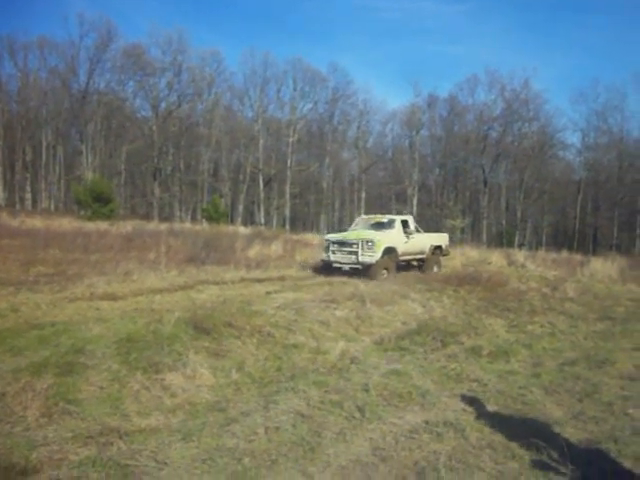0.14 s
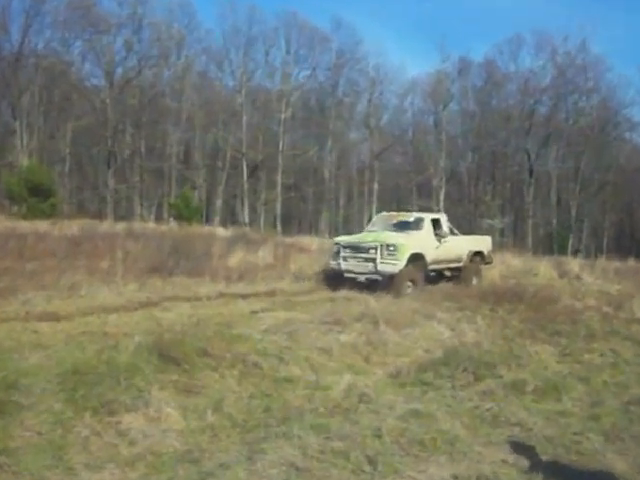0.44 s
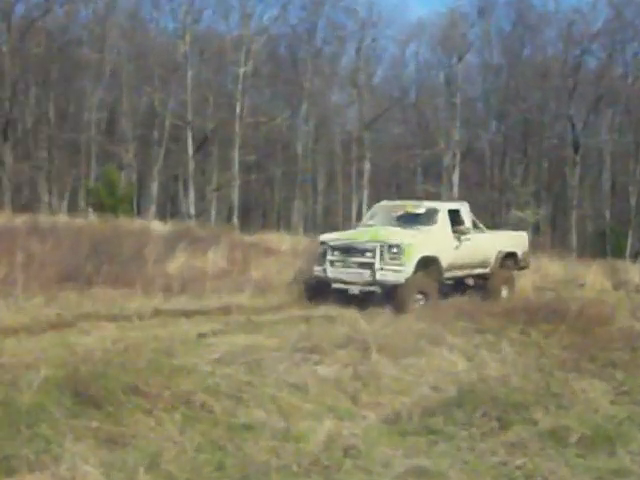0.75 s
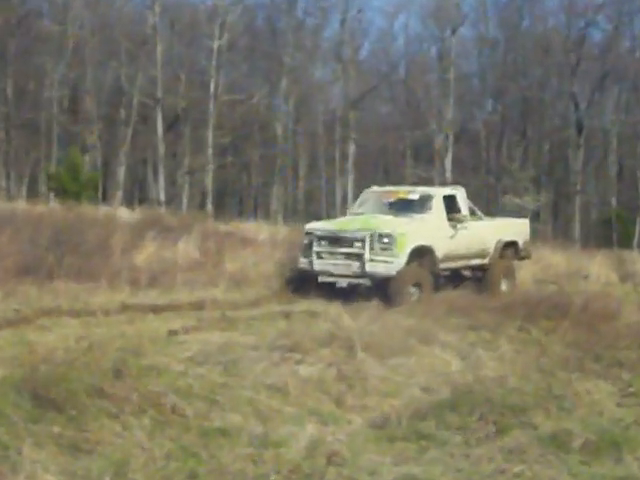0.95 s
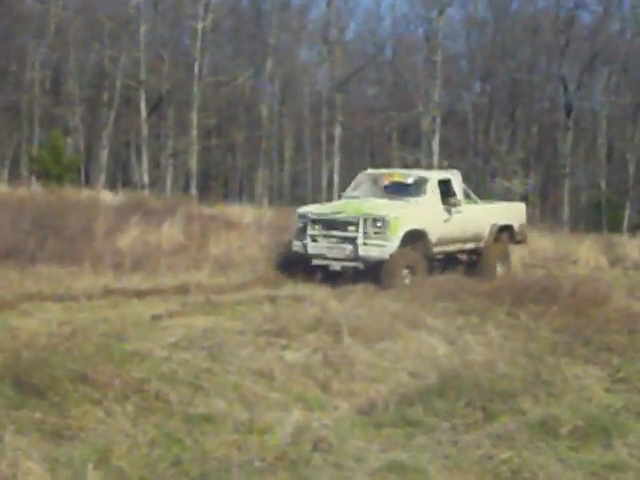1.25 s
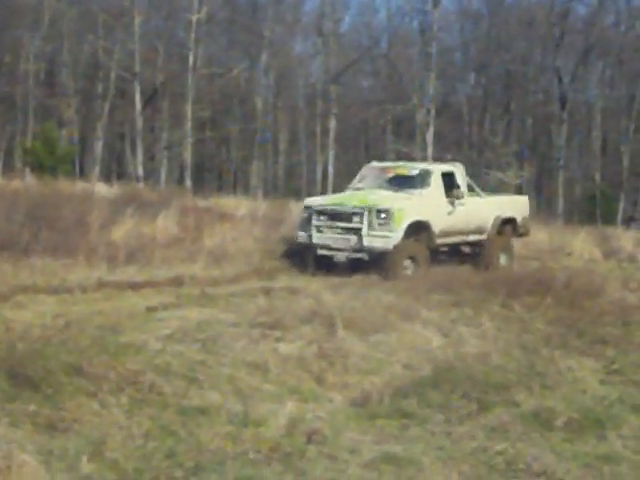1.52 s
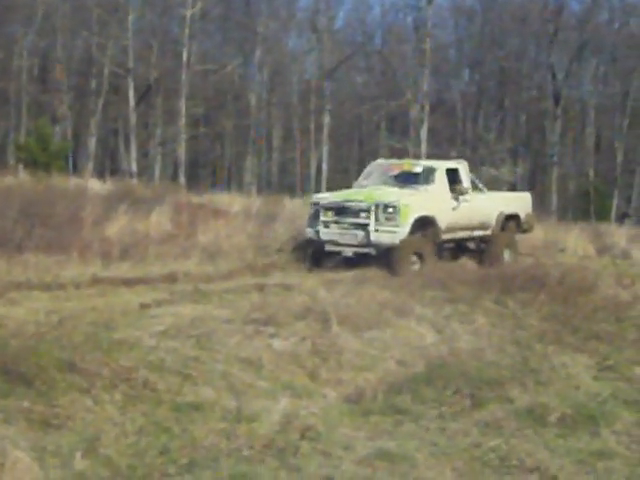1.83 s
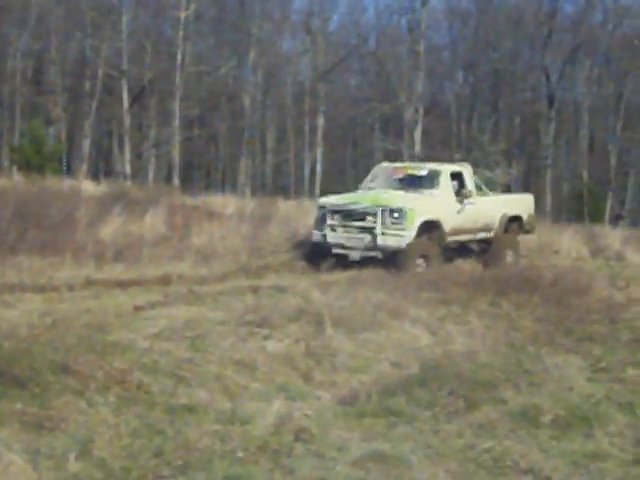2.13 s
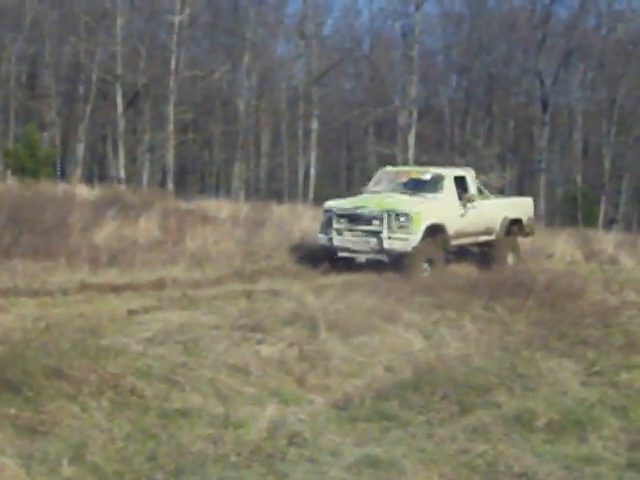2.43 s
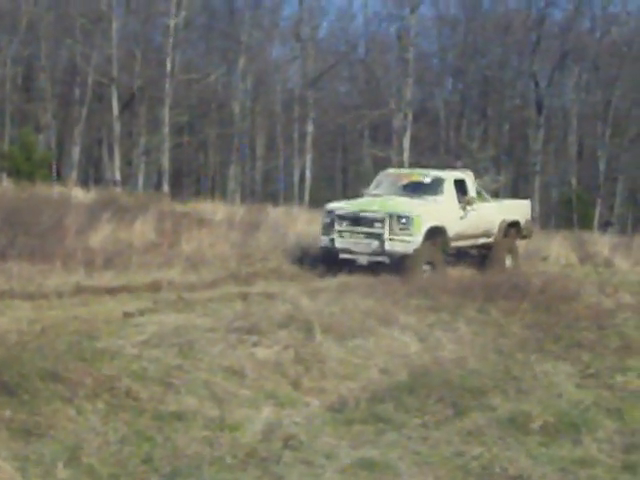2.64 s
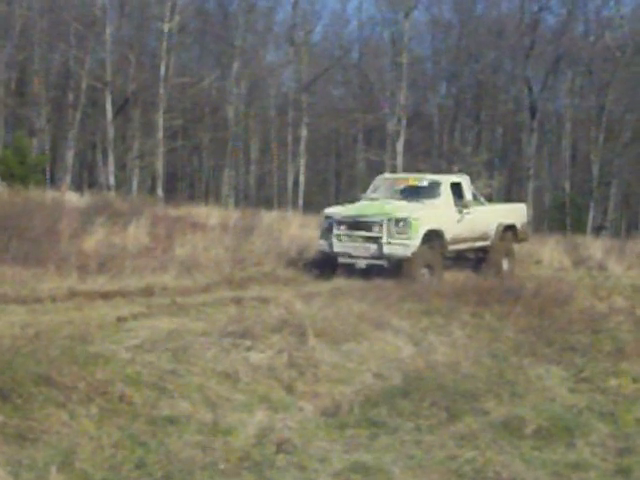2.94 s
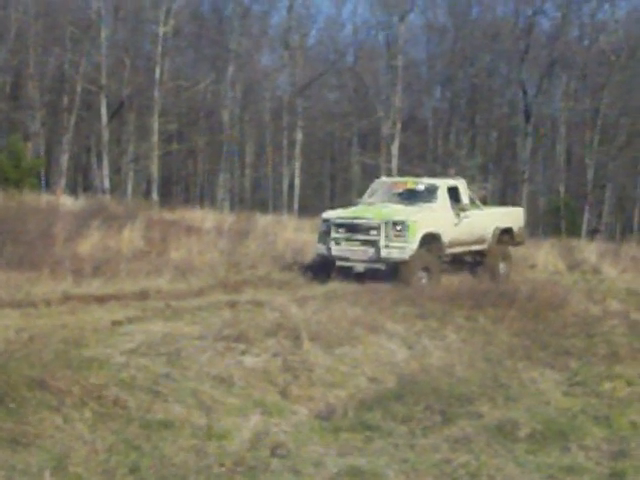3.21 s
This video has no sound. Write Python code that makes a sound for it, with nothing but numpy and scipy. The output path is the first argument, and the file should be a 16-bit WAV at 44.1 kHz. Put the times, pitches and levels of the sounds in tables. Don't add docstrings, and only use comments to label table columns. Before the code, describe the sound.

A pickup truck engine lopes, revs up hard with a raspy roar, then drops to uneven idle.

```python
import sys
import numpy as np
from scipy import signal
from scipy.fft import rfft, irfft
from scipy.io import wavfile

SR = 44100
rng = np.random.default_rng(int(sys.argv[2]) if len(sys.argv) > 2 else 0)


def master_out(mix):
    frames = np.transpose(np.atleast_2d(mix))
    ceiling = np.clip(frames, -1, 1)
    pcm = np.round(ceiling * 32767).astype(np.int16)
    wavfile.write(sys.argv[1], SR, pcm)


def makeup_ratio(level_db):
    decades = np.asarray(level_db, float) / 20
    return 10 ** decades


N = 148617
RUN_IN = 8192

# (frequency [Hz], width [Hz], lift [dB])
PIPE_RESONANCES = [(833, 150, 4), (1483, 11, 7.5), (2065, 47, 8.5), (2740, 93, 5.5), (3370, 260, 7.5),
                   (4202, 340, 10), (5200, 500, 7.5), (5630, 810, 1.5)]


def rms_one(x):
    return x / np.sqrt(np.mean(x ** 2) + 1e-20)


def in_time(rows):
    s, *columns = np.transpose(rows)
    return [np.interp(np.arange(N) / SR, s, column) for column in columns]


def colour(x, points, rings=()):
    size = 2 ** 18
    hz = np.arange(size // 2 + 1) * SR / size + 1
    point_hz, point_db = np.array(points).T
    db = np.interp(np.log(hz), np.log(point_hz), point_db)
    outside = np.maximum(point_hz[0] / hz, 1) * np.maximum(hz / point_hz[-1], 1)
    db = db - 24 * np.log2(outside)
    for ring_hz, width, lift_db in rings:
        db = db + lift_db / (1 + (2 * (hz - ring_hz) / width) ** 2)
    cepstrum = irfft(np.maximum(db, -130) * np.log(10) / 20)
    cepstrum[1:size // 2] *= 2
    cepstrum[size // 2 + 1:] = 0
    filtered = irfft(rfft(x, size) * np.exp(rfft(cepstrum)))
    return rms_one(filtered[len(x) - N:len(x)])


def drift(rate):
    r = np.exp(-2 * np.pi * rate / SR)
    noise = rng.standard_normal(N + SR)
    return rms_one(signal.lfilter([1], [1, -2 * r, r * r], noise)[SR:])


def train(s, sizes, lead=0):
    out = np.zeros(N + lead)
    i = (s * SR).astype(int) + lead
    inside = (i >= 0) & (i < N + lead)
    np.add.at(out, i[inside], sizes[inside])
    return out


def puff(clicks, rise_s, fall_s):
    a, b = np.exp(-1 / (rise_s * SR)), np.exp(-1 / (fall_s * SR))
    return signal.lfilter([1 - a], np.convolve([1, -a], [1, -b]), clicks + 1e-18)


def split(x, edges_hz):
    lows = [signal.sosfiltfilt(signal.butter(3, hz, fs=SR, output="sos"), x) for hz in edges_hz]
    return np.diff([0 * x, *lows, x], axis=0)


def truck():
    # (time [s], four-stroke cycles completed [count])
    crank = [(-.1667, -1), (.42, 3), (.585, 4), (.778, 5.25), (.833, 5.625), (.8487, 5.75), (.8665, 5.875),
             (.897, 6), (1.012, 7), (1.1215, 8), (1.4445, 11), (1.8721, 15), (1.985, 16), (2.175, 17),
             (2.5301, 18.375), (2.7087, 19), (2.9696, 20), (3.2405, 21), (3.53, 22)]
    # (time [s], rasp peak [dB], thump [dB], load [0-1])
    throttle = [(0, -28, -19, 0.9), (.36, -30, -23, 0.76), (.58, -27, -17.5, 0.4), (.8, -25, -22, .2),
                (.845, -22.5, -18.5, 1), (.9, -12, -19.5, 0.81), (1.0, -17.5, -24, 0.87),
                (1.4, -17.5, -23.5, 0.82), (1.85, -21, -22.5, 0.96), (2.03, -26.5, -27.5, 1),
                (2.22, -48.5, -34.5, 0.4), (2.55, -29, -36, 0.2), (2.72, -23.5, -29, 0.6),
                (2.79, -19.5, -50, .05), (2.88, -19.5, -62, .05), (2.98, -20, -38.5, 0.2),
                (3.14, -23, -40.5, .05), (3.37, -19.5, -36.5, 0.06)]
    # (idle rasp [dB], load rasp [dB], load body [dB], load thump [dB], idle thump [dB])
    cylinders = [(2, -2, -7, 0.5, -9), (-29.5, -18.5, -12, 0, -13), (-0.05, -20.5, -2.5, -2.5, -7),
                 (0.5, -0.5, 1, 1, -13.5), (-23.5, -14.5, -5.5, 0, -3), (-4, 0.5, -7, -1.5, -13),
                 (-18.5, 0, 0.5, 1, -9), (-14.5, -10.5, -11.5, -2.5, -11)]
    # (time [s], change [dB])
    odd_firings = [(.036, -3), (.13, -0.5), (.275, 2.5), (.584, -7.5), (.682, -3), (.74, -3), (.775, -8),
                   (.797, 2), (.8487, 5), (.8665, 12.5), (.926, 2), (1.041, 7.5), (1.1218, 0.5),
                   (1.2005, 1), (1.311, 2.5), (1.526, -1), (1.7, 0.5), (1.161, 0.5), (1.486, -1),
                   (1.619, 2.5), (1.833, 3), (2.47, -1), (2.53, 2), (2.6, 3), (2.774, 3.5), (2.97, 0),
                   (3.034, 1.5), (3.068, 1.5), (3.135, 2.5), (3.207, 3), (3.348, 4.5)]
    # (frequency [Hz], level [dB per Hz])
    load_rasp = [(260, -60.5), (450, -29.5), (820, -10), (1080, -18.5), (1490, -11.5), (2350, -19.5),
                 (3370, -20), (5550, -29.5), (6730, -10.5), (8750, -60), (14800, -120)]
    # (frequency [Hz], level [dB per Hz])
    idle_rasp = [(260, -43), (450, -22.5), (1560, -2.5), (2240, -16.5), (2570, -4.5), (3370, -7.5),
                 (3870, -17), (5490, -16.5), (6730, -4), (8750, -34), (14800, -120)]

    rasp_db, thump_db, load = in_time(throttle)
    load = np.clip(load, 0, 1)
    firing = np.arange(-8, 176)
    chance = rng.standard_normal((len(firing), 3))
    crank_s, cycles = np.transpose(crank)
    s = np.interp(firing / 8, cycles, crank_s) + .0004 * chance[:, 0]
    idle_db, load_db, body_db, pull_db, lope_db = np.array(cylinders)[firing % 8].T
    odd_db = np.zeros(len(firing))
    for at_s, extra_db in odd_firings:
        odd_db[np.abs(s - at_s).argmin()] = extra_db

    out = makeup_ratio(thump_db) * thumps(s, pull_db, lope_db, chance[:, 1])
    # share, rasp dB, body dB, lead s, rise s, fall s, spectrum
    pulling = (load, load_db, body_db, .001, .0006, .0065, load_rasp)
    idling = (1 - load, idle_db, idle_db, .004, .0015, .0075, idle_rasp)
    for share, db, dull_db, *shape in (pulling, idling):
        out = out + np.sqrt(share) * makeup_ratio(rasp_db) * rasp(s, db, dull_db, odd_db, chance, load, *shape)
    return out


def thumps(s, pull_db, lope_db, chance):
    # (time [s], share [0-1])
    pull_share = [
        (0, .1),
        (.82, .1),
        (.9, 1),
        (2.02, 1),
        (2.25, .15),
        (3.37, .15),
    ]
    # (frequency [Hz], level [dB])
    load_pipe = [(25, -26), (50, -24), (74, 3.5), (105, -3), (148, -11), (200, -17), (260, -12.5),
                 (420, -28.5)]
    # (frequency [Hz], width [Hz], lift [dB])
    load_rings = [(147, 28, 6), (247, 65, 2)]
    # (frequency [Hz], level [dB])
    idle_pipe = [(25, -28.5), (50, -17.5), (87, 2), (110, -15.5), (150, -20.5), (250, -20.5), (420, -33)]
    # (frequency [Hz], width [Hz], lift [dB])
    idle_boom = [(87, 8, 10)]

    scatter_db = 1.8 * chance
    pull = colour(train(s, -makeup_ratio(pull_db + scatter_db), RUN_IN), load_pipe, load_rings)
    lope = colour(train(s, -makeup_ratio(lope_db + scatter_db), RUN_IN), idle_pipe, idle_boom)
    (share,) = in_time(pull_share)
    return share * pull + (1 - share) * lope


def rasp(s, db, dull_db, odd_db, chance, load, lead_s, rise_s, fall_s, spectrum):
    scatter_db = 1.2 * chance
    gas = colour(rng.standard_normal(N) * makeup_ratio(2.5 * drift(400)), spectrum)
    gate = puff(train(s - lead_s, makeup_ratio(db + odd_db + scatter_db[:, 2])), rise_s, fall_s)
    body_sizes = makeup_ratio(dull_db + odd_db + 2 + scatter_db[:, 0])
    swell = puff(train(s - lead_s + .00069, body_sizes), .003, .006)
    body, bright = split(gas, [1500])
    roar = signal.sosfilt(signal.butter(2, 2880, fs=SR, output="sos"), gas)
    blown = bright * gate + body * swell + makeup_ratio(-15.5) * (load + .033) * roar

    pop = colour(train(s, makeup_ratio((db + dull_db) / 2 + odd_db)), spectrum)
    pop_size = np.sqrt(np.mean(train(s, makeup_ratio(db)) ** 2))
    blown = blown + makeup_ratio(8) * load * pop * pop_size
    strength = np.sqrt(np.mean(blown ** 2))
    return strength * colour(blown, [(300, 0), (9000, 0)], PIPE_RESONANCES)


def drone():
    # (time [s], firing rate [Hz], level [dB], boom [dB])
    engine = [(0.0, 25.5, -30, -2), (0.11, 24.74, -26, -7), (0.28, 25.97, -26.5, -13),
              (0.37, 25.71, -24.5, -1), (0.45, 26.35, -23, -18), (0.57, 28.6, -31.5, -18),
              (0.86, 29.4, -19.5, 0.5), (1.15, 31.63, -24, 1.5), (1.45, 30.22, -22.5, 2),
              (1.71, 32.05, -23.5, -3.5), (1.9, 32.42, -23.5, -7), (2.2, 33.97, -25, -4.5),
              (2.31, 32.98, -22.5, -17), (2.52, 36.1, -23, 3.5), (2.72, 36.66, -24, -2),
              (2.9, 37.74, -25, 6.5), (3.08, 39.26, -25.5, -9.5), (3.37, 40.7, -25.5, 3)]
    # (frequency [Hz], level [dB])
    pipe = [(33, -7), (64, -8.5), (80, 3.5), (104, -1.5), (136, -2.5), (200, -11), (305, -18), (400, -36)]
    # (frequency [Hz], width [Hz], lift [dB])
    pipe_rings = [(332, 58, 4.5), (130.4, 20, 3.5)]
    # (frequency [Hz], level [dB per Hz])
    clatter_spectrum = [(520, -8.5), (640, -5.5), (1400, -5.5), (1850, -10.5), (3800, -17.5), (4800, -20.5),
                        (5900, -21.5), (6800, -28.5)]

    hz, db, boom_db = in_time(engine)
    turns = np.cumsum(hz) / SR
    firing = np.arange(-4, int(turns[-1]) + 1)
    chance = rng.standard_normal((len(firing), 2))
    turn_s = np.r_[-5 / hz[0], np.arange(N) / SR]
    s = np.interp(firing + .2808, np.r_[-5, turns], turn_s) + .00018 * chance[:, 0]
    speed = np.interp(s * SR, np.arange(N), hz / hz.mean())
    pulses = train(s, makeup_ratio(1.2 * chance[:, 1]) / np.sqrt(speed), RUN_IN)

    swell = makeup_ratio(5 * puff(pulses[RUN_IN:], .0053, .008) + 1.2 * drift(6))
    clatter_rings = PIPE_RESONANCES[:2] + [(2770, 120, 2.6), (4000, 300, 4), (5780, 120, 2.1)]
    clatter = colour(rng.standard_normal(N) * swell, clatter_spectrum, clatter_rings)

    exhaust = pulses + makeup_ratio(-12) * np.roll(pulses, int(.0125 * SR))
    boom, *upper = split(colour(muffler(exhaust), pipe, pipe_rings), (95, 170, 240))
    note = makeup_ratio(boom_db) * boom
    for waver_db, band in zip((1.1, 2.2, 2.2), upper):
        note = note + makeup_ratio(waver_db * drift(5.2)) * band
    return -makeup_ratio(db) * note + makeup_ratio(-39.5) * clatter


def muffler(x):
    # (frequency [Hz], width [Hz])
    chambers = [(130, 50), (210, 45), (290, 50), (350, 60), (265, 22), (330, 25)]
    for hz, width in chambers:
        r = np.exp(-np.pi * width / SR)
        a = [1, -2 * r * np.cos(2 * np.pi * hz / SR), r * r]
        x = signal.lfilter(a[::-1], a, x)
    return x


def ticks():
    # (time [s], peak [dB], low share [dB], high share [dB])
    touches = [
        (0.4512, -7, -15, -3),
        (0.7481, -11.5, -16, -1.5),
        (0.8725, -10.5, -3.5, -8),
    ]
    # (frequency [Hz], level [dB], time to fall 60 dB [s])
    plastic_modes = [(2520, -3.5, 0.0092), (3330, -15.5, 0.018), (2700, -10, 0.0076), (4120, -16.5, 0.014),
                     (3420, -11.5, 0.0063), (4930, -9, .005), (4480, -15.5, 0.0058), (6200, -15.5, 0.0066),
                     (5370, -17, 0.011), (1660, -9.5, 0.0056), (1150, 5.5, 0.0039), (413, -16, 0.02)]

    s, db, low_db, high_db = np.transpose(touches)
    out = puff(train(s, makeup_ratio(db - 9)), .0003, .0012) * rng.standard_normal(N)
    for k, (hz, level_db, t60) in enumerate(plastic_modes):
        r, w = makeup_ratio(-60 / (t60 * SR)), 2 * np.pi * hz / SR
        sizes = (-1) ** k * makeup_ratio(db + level_db + low_db * (hz < 2000) + high_db * (hz > 3000))
        at_s = s - .0005 * (hz < 2000)
        clicks = train(at_s, sizes) + makeup_ratio(-9) * train(at_s + .00082, sizes)
        out = out + signal.lfilter([0, np.sin(w)], [1, -2 * r * np.cos(w), r * r], clicks + 1e-18)
    return makeup_ratio(10.5) * signal.sosfilt(signal.butter(12, 6000, fs=SR, output="sos"), out)


def wind():
    band = signal.butter(2, [22, 55], "band", fs=SR, output="sos")
    low = signal.sosfilt(band, rng.standard_normal(N))
    return makeup_ratio(-41 + 2.5 * drift(1.4)) * rms_one(low)


def scene():
    # (delay [s], level [dB])
    echoes = [
        (.013, -20),
        (.045, -18),
        (.09, -21),
    ]
    far = truck()
    dull = signal.lfilter([.3], [1, -.7], far)
    for s, db in echoes:
        far = far + makeup_ratio(db) * np.r_[np.zeros(int(s * SR)), dull][:N]
    return (far + drone() + ticks() + wind())[None]


def roll_off(x):
    return signal.sosfilt(signal.butter(12, 6880, fs=SR, output="sos"), x)


def record(dry):
    treble_cut = signal.cheby2(12, 72, 7120, fs=SR, output="sos")
    x = signal.sosfilt(treble_cut, dry) + .0165
    return roll_off(np.clip(x, -.97, .97))


dry = scene()
out = record(dry)
master_out(out)
```